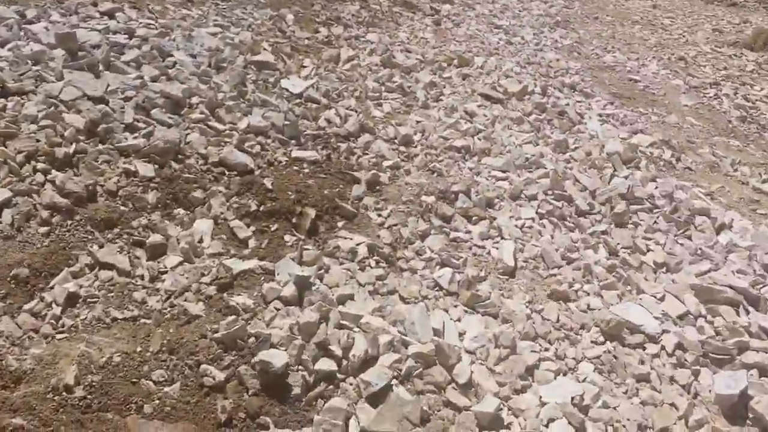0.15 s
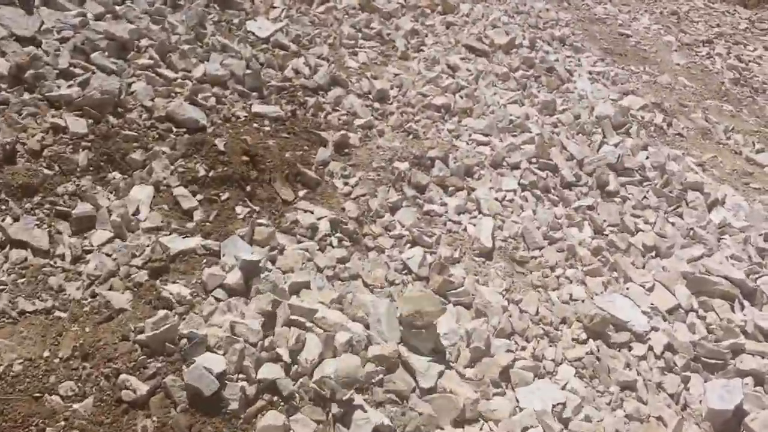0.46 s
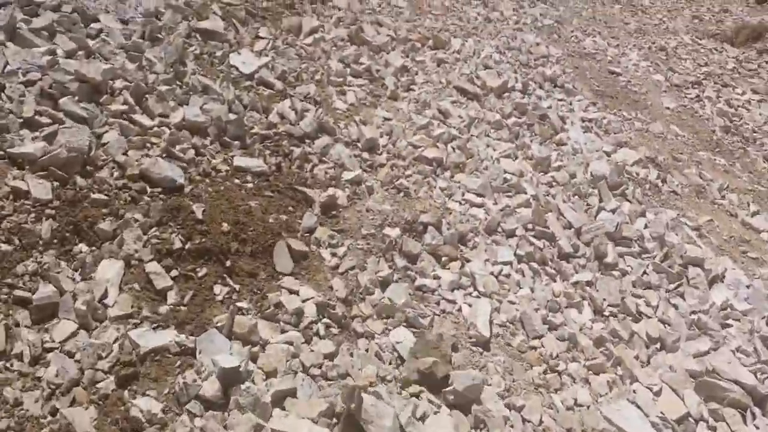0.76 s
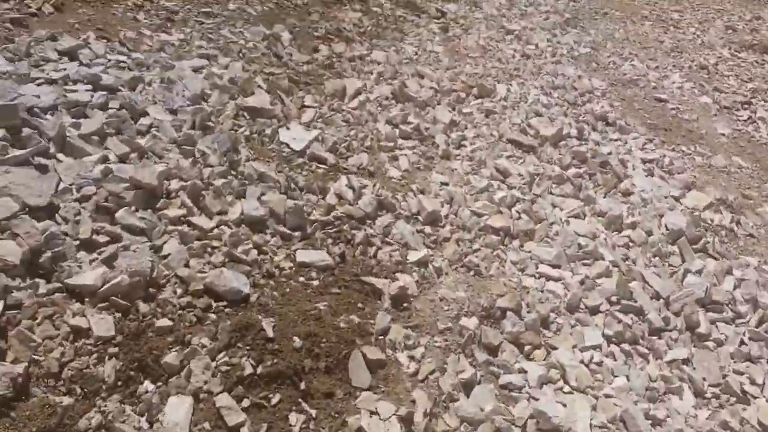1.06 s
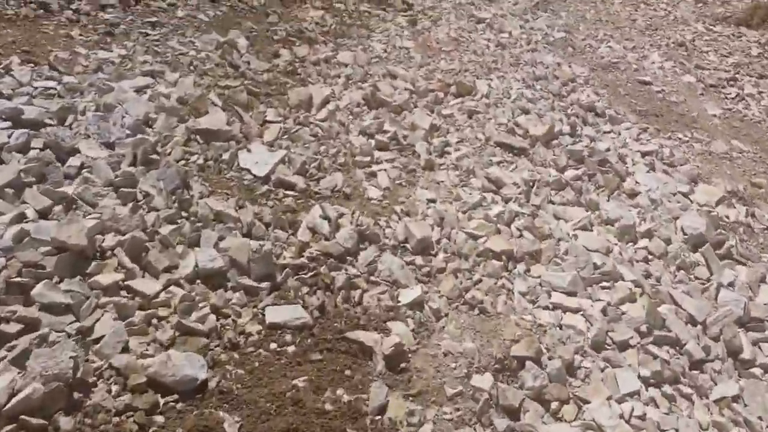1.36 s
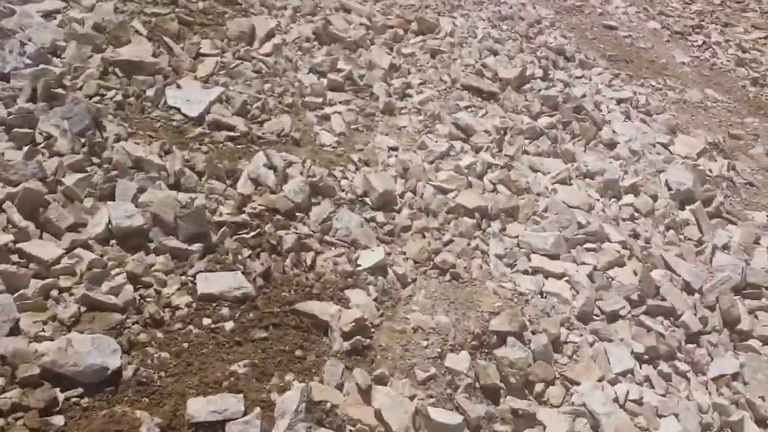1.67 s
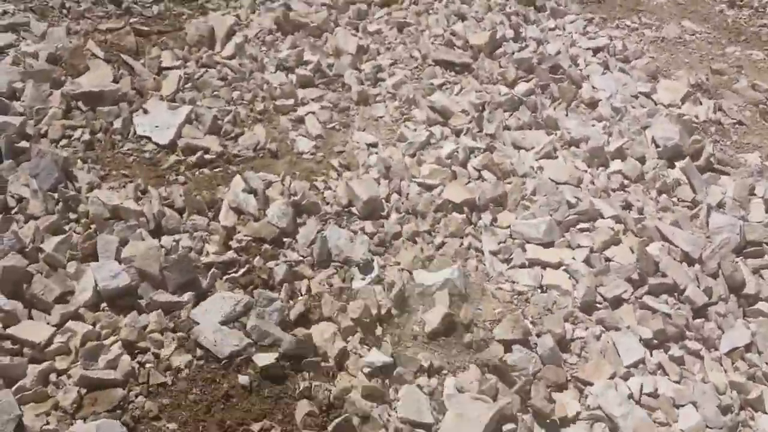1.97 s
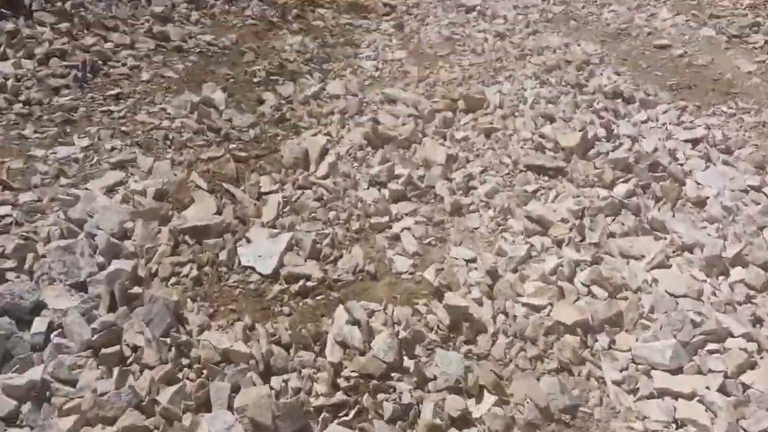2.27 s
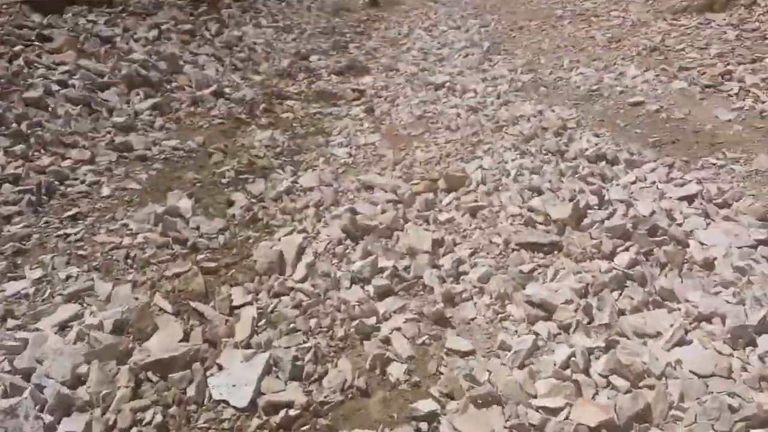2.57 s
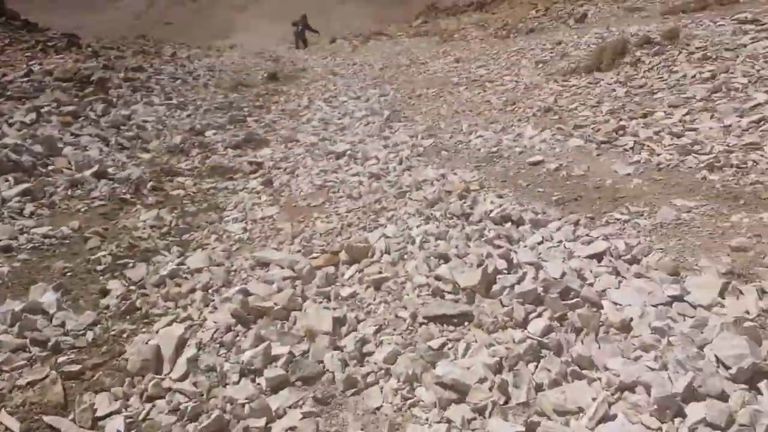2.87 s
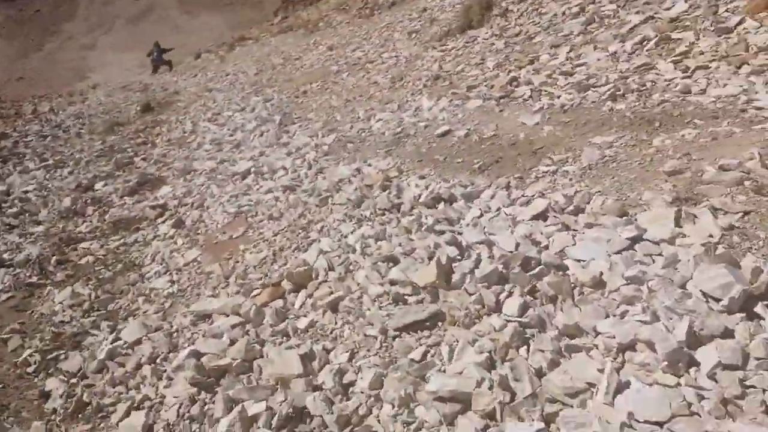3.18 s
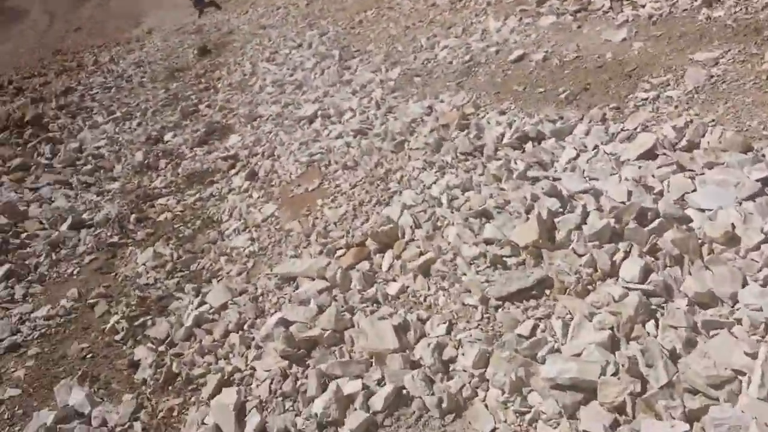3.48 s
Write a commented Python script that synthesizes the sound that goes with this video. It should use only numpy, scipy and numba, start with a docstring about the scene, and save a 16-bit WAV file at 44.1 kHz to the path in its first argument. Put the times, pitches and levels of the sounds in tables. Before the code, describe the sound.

Loose scree slides and clatters close to a hand-held camera, dry and bright outdoors. Gravel rattles with hard stone clacks from the start, thinning after 0.5 seconds. Wind thuds on the left, roughest near 1.3. A crunching boot shove and dense slide burst out at 1.4-1.8, easing into scattered clacks by 2.3. Crunches return at 2.4-3.0, a brief gust at 3.3, and stones surge again at the end.

```python
"""Boots on a scree slope

Boots slide down steep loose rock, heard close by from a hand-held camera with two microphone ports.
Low crunches and sandy hiss are dense random contacts; running grit and chips are crackle and tiny rings.
Single stones clack, ring briefly and knock, each with one rebound. Wind buffets mostly the left port,
whose colour is hollow and resonant; a limiter softens the loudest moments."""
import sys
import numpy as np
from scipy import signal
from scipy.fft import rfft, irfft
from scipy.io import wavfile
from scipy.ndimage import uniform_filter1d, minimum_filter1d
from numba import njit

SR = 44100
rng = np.random.default_rng(int(sys.argv[2]) if len(sys.argv) > 2 else 0)


def log_audio(samples):
    """Write samples as a 16-bit WAV file to the path given in sys.argv[1]."""
    # one column per channel
    frames = np.atleast_2d(samples).T
    # limit to full scale, then quantise
    limited = np.clip(frames, -1, 1)
    pcm = np.round(limited * 32767).astype(np.int16)
    wavfile.write(sys.argv[1], SR, pcm)


N = 159642

# weight of the boots shoving the scree, before each layer's own offset: time_s, level_db
BOOT_SHOVE = [(0, -40.5), (.17, -43), (.25, -46.5), (.315, -35), (.39, -46), (.6, -55.5), (.95, -52.5),
              (1.3, -45), (1.38, -35.5), (1.49, -34.5), (1.55, -28.5), (1.66, -37), (1.75, -48.5),
              (1.95, -57.5), (2.39, -51), (2.425, -35.5), (2.52, -39), (2.58, -38), (2.72, -35.5),
              (2.85, -33), (2.89, -39), (3.02, -40), (3.25, -51), (3.45, -46.5), (3.53, -35.5), (3.62, -40)]
# how much scree is running, before each layer's own offset: time_s, level_db
SCREE_FLOW = [(0, -28), (.13, -27.5), (.16, -31), (.19, -27), (.35, -29), (.48, -28.5), (.6, -34.5),
              (.8, -34), (.95, -38), (1.12, -36), (1.21, -38), (1.325, -38), (1.385, -23.5), (1.46, -21.5),
              (1.58, -23.5), (1.78, -24.5), (2.02, -27.5), (2.2, -31), (2.3, -31), (2.45, -32),
              (2.49, -36.5), (2.56, -36), (2.61, -29), (2.8, -29), (2.93, -32), (3.02, -29), (3.15, -32),
              (3.44, -31.5), (3.53, -28.5), (3.62, -24)]
# modes of a struck slab: ratio to its pitch, level_db
SLAB_MODES = [(0.581, -5.5), (0.798, -6.5), (1, 0.5), (1.311, -7.5), (1.74, -9)]


def undb(db):
    """Decibels to gain."""
    return 10 ** (np.asarray(db) / 20)


def unit(x):
    """Scale to rms 1."""
    return x / np.sqrt(np.mean(x ** 2))


def curve(rows):
    """Join (time_s, value) rows by straight lines."""
    times, values = np.array(rows).T
    return np.interp(np.arange(N) / SR, times, values)


def walk(rate_hz):
    """Smooth random drift of rms 1, heading for a new value at the given rate."""
    step = max(int(SR / rate_hz), 1)
    stairs = np.repeat(rng.standard_normal(N // step + 1), step)
    return unit(uniform_filter1d(stairs, step)[:N])


def colour(x, points, size=262144):
    """Causal, minimum-phase filter through (freq_hz, level_db) points."""
    hz, db = np.array(points).T
    freqs = np.maximum(np.arange(size // 2 + 1) * SR / size, 1)
    level_db = np.interp(np.log(freqs), np.log(hz), db)
    # folding the cepstrum onto positive time makes the filter causal
    cepstrum = irfft(np.log(undb(level_db)))
    cepstrum[1:size // 2] *= 2
    cepstrum[size // 2 + 1:] = 0
    response = np.exp(rfft(cepstrum))
    return irfft(rfft(x, size) * response)[..., :N]


@njit
def rings(start_s, hz, t60_s, gain, out_size):
    """Sum of damped sines, one for each struck mode."""
    out = np.zeros(out_size)
    for k in range(len(start_s)):
        first = int(start_s[k] * SR) + 1
        rate = (2j * np.pi * hz[k] - np.log(1000.) / t60_s[k]) / SR
        # start between samples, then turn and shrink by one step per sample
        state = gain[k] * np.exp(rate * (first - start_s[k] * SR))
        step = np.exp(rate)
        for i in range(max(first, 0), min(first + int(t60_s[k] * SR), out_size)):
            out[i] += state.imag
            state *= step
    return out


def contacts(per_s, spread_db, lag_spread_s, size=48000):
    """Random contacts, mostly weak: arrival times and signed strengths at the two ports."""
    port_lag_s, pan_spread_db = .00002, 3
    count = int(per_s * N / SR)
    u = rng.random((size, 2))[:count]
    g = rng.standard_normal((size, 2))[:count]
    signs = (-1) ** np.arange(len(u))
    strength = signs * undb(spread_db * np.minimum(-np.log(u[:, 1]), 4.5))
    sides = np.array([[.5], [-.5]])  # left, right
    times = u[:, 0] * N / SR + sides * (port_lag_s + lag_spread_s * g[:, 0])
    return times, strength * undb(sides * pan_spread_db * g[:, 1])


def clicks(times, gains):
    """One sharp impulse for each contact, at both ports."""
    ports = []
    for t, gain in zip(times, gains):
        places = np.clip(t * SR, 0, N).astype(int)
        ports.append(np.bincount(places, gain, N + 1)[:N])
    return np.array(ports)


def crunch():
    """The packed stones under a boot grind together: dense contacts coloured low."""
    # spectrum of the grinding: freq_hz, level_db
    crunch_spectrum = [(40, -21), (120, -14), (250, -2), (550, 1.5), (850, -0.5), (1400, -6), (2000, -20.5),
                       (3500, -13), (8000, -29)]
    hits = clicks(*contacts(per_s=1800, spread_db=1, lag_spread_s=.00011))
    grains = unit(colour(hits, crunch_spectrum))
    return grains * undb(3.5 + curve(BOOT_SHOVE) + 2 * walk(60))


def sand():
    """Fine sand hisses under a boot while it shoves: very dense contacts coloured high."""
    # spectrum of the hiss: freq_hz, level_db
    sand_spectrum = [(2000, -35), (6000, -12), (9500, -1), (12000, 0), (14500, -3)]
    hits = clicks(*contacts(per_s=9000, spread_db=2.2, lag_spread_s=.0001))
    return unit(colour(hits, sand_spectrum)) * undb(-13 + curve(BOOT_SHOVE))


def grit():
    """Gravel sizes crackle in their own registers; all surge together, and each about as much on its own."""
    # gravel sizes, coarse to fine: centre_hz, contacts_per_s, strength_spread_db, level_db
    gravel_sizes = [(1220, 1300, 2.5, -8), (2470, 1200, 3.6, -4), (4160, 1200, 3, -3),
                    (5700, 1300, 3.5, -1), (7500, 1500, 3.5, -3.5), (11300, 4500, 2.8, -5.5)]
    # share of coarse gravel: time_s, boost_db (in full an octave or more below fine_hz)
    coarse_share = [(0, 5), (.2, 0.5), (1.0, 1), (1.45, 1), (1.9, -2), (2.4, 2), (2.8, -2.5), (3.05, -2),
                    (3.4, -3), (3.55, 2.5)]
    # colour laid over all the grit: freq_hz, level_db
    grit_spectrum = [(100, -34), (400, -16), (800, 1), (1500, -1.5), (3000, -0.5), (5500, 1.5), (8000, 0),
                     (11000, 2), (14500, 0.5)]
    fine_hz = 4850
    width = 0.3  # share of the centre on each side
    mix = 0
    for hz, per_s, spread_db, db in gravel_sizes:
        edges = [hz * (1 - width), hz * (1 + width)]
        band = signal.butter(2, edges, "bandpass", fs=SR, output="sos")
        grains = signal.sosfilt(band, clicks(*contacts(per_s, spread_db, lag_spread_s=.00008)))
        coarse_db = curve(coarse_share) * np.clip(np.log2(fine_hz / hz), 0, 1)
        own_surge_db = 1.54 * walk(50)
        mix = mix + unit(grains) * undb(db + coarse_db + own_surge_db)
    shared_surge_db = 1.43 * walk(90)
    return unit(colour(mix, grit_spectrum)) * undb(-2 + curve(SCREE_FLOW) + shared_surge_db)


def chips(size=8000):
    """Small flakes tumble along; each ticks and rings in slab modes at its own pitch."""
    # colour laid over all the chips: freq_hz, level_db
    chip_spectrum = [(200, -36), (500, 0.5), (900, -0.5), (2000, -1), (5500, -0.5), (9000, -5), (14500, -6)]
    middle_hz, spread_octaves, middle_t60_s = 5200, .55, 0.012
    times, gains = contacts(per_s=800, spread_db=2, lag_spread_s=.00007)
    g = rng.standard_normal((size, 2 + 2 * len(SLAB_MODES)))[:times.shape[1]].T
    pitch = middle_hz * 2 ** (spread_octaves * g[0])
    t60 = middle_t60_s * 2 ** np.clip(g[1], -1, 1)
    mix = 1.25 * clicks(times, gains)
    for k, (ratio, db) in enumerate(SLAB_MODES):
        hz = np.minimum(pitch * ratio, SR * .45)
        ports = []
        for c in (0, 1):
            mode_gain = gains[c] * undb(db) * g[2 + 2 * k + c] / 2
            ports.append(rings(times[c], hz, t60, mode_gain, N))
        mix = mix + np.array(ports)
    return unit(colour(mix, chip_spectrum)) * undb(-5 + curve(SCREE_FLOW))


def clacks(size=2048):
    """Larger stones collide and rebound: a crack, a short ring, a dull knock and a scrape of grit."""
    # collisions, levels before the offsets below:
    # start_s, strength_db, ring_hz, knock_db, ring_t60_s, scrape_db
    collisions = [(0.02, -4, 3230, -8, 0.016, -19), (0.0563, -16.5, 5360, 4, 0.01, -14),
                  (0.067, -12, 7100, 2, 0.011, -16), (0.0952, -13, 5900, -19, 0.011, -14),
                  (0.122, -3, 7400, -14, 0.011, -14), (0.1511, -0.5, 6470, -18, 0.0086, -12),
                  (0.175, -9, 5600, -5.5, 0.011, -14), (0.2466, -10, 4450, -29, 0.011, -14),
                  (0.27, -12.5, 5900, -20, 0.011, -14), (0.3493, -8, 6650, -33, 0.012, -16),
                  (0.481, -11, 5430, -13, 0.0099, -14), (0.5067, -21, 5430, -28, 0.011, -17),
                  (0.6225, -16.5, 5840, -17, 0.011, -14), (0.6644, -13, 5030, -7, 0.011, -11),
                  (0.7162, -14, 5830, -3.5, 0.012, -19), (0.7578, -15, 5630, -32, 0.011, -14),
                  (0.8031, -12, 5640, -30, 0.01, -12), (0.9053, -16, 6100, -29, 0.011, -14),
                  (0.9837, -23, 5860, 0, 0.011, -14), (1.1159, -15.5, 5000, -5, 0.01, -14),
                  (1.1363, -12, 6300, -18, 0.011, -12), (1.2534, -12.5, 6460, -9, 0.0097, -10),
                  (1.287, -14, 6000, -27, 0.011, -10), (1.3374, -14, 4800, -10, 0.011, -12),
                  (1.3693, -11, 5460, -9, 0.01, -16), (1.4697, -5.5, 3960, -26, 0.011, -16),
                  (1.6556, -10.5, 5500, -24, 0.012, -14), (1.7409, -9, 4870, -17, 0.011, -14),
                  (1.7807, -2, 5530, -30, 0.011, -14), (1.8424, -8.5, 6150, -41, 0.011, -14),
                  (1.868, -11, 5700, -29, 0.011, -17), (1.8861, -7, 5270, -29, 0.011, -19),
                  (1.9151, -9.5, 5640, -30, 0.011, -14), (1.9844, -10.5, 5960, -20, 0.01, -16),
                  (2.0594, -7.5, 5260, -26, 0.01, -14), (2.072, -8.5, 5100, -21, 0.012, -14),
                  (2.144, -9, 5320, -28, 0.011, -14), (2.162, -4.5, 5320, -9, 0.01, -14),
                  (2.223, -8.5, 5750, -22, 0.0077, -15), (2.375, -9.5, 6030, -9, 0.011, -16),
                  (2.388, -7, 2500, -25, 0.011, -17), (2.4108, -8, 5700, -25, 0.0094, -16),
                  (2.4626, -8, 5160, -13, 0.01, -18), (2.5985, -14, 5250, -25, 0.011, -14),
                  (2.8793, -9.5, 5800, -31, 0.0099, -10), (2.9283, -13.5, 5550, -22, 0.0095, -13.5),
                  (2.9594, -5, 4960, -11, 0.013, -17), (3.1127, -10, 6000, -31, 0.011, -17),
                  (3.2126, -7.5, 5200, -39, 0.014, -14), (3.231, -11, 5600, -17, 0.011, -17),
                  (3.2588, -6.5, 5230, -29, 0.0076, -14), (3.3086, -15, 8050, -23.5, 0.011, -11),
                  (3.3211, -9.5, 5180, -28, 0.013, -15), (3.3867, -9.5, 5950, -22, 0.009, -15),
                  (3.412, -11, 5600, -28, 0.011, -14), (3.4761, -10, 6000, -10, 0.011, -14),
                  (3.4845, -6.5, 4920, -10, 0.01, -13), (3.5129, -7, 4930, -11, 0.01, -14)]
    # colour laid over all the collisions: freq_hz, level_db
    crack_spectrum = [(200, -20.5), (900, 0), (2500, -1), (6500, 0), (9000, -2.5), (14500, -3.5)]
    clack_db, crack_db, rebound_db = -1.5, -4, -9.5
    delay_s = .0008  # short fixed delay before each collision sounds
    rebound_s = .011  # middle wait for the second touch
    crack_decay_s, scrape_decay_s = 0.00031, 0.0016  # time constants
    knock_offset_db, middle_knock_hz, knock_t60_s = 1.5, 1520, 0.0086
    out = np.zeros((2, N + 2 * size))
    t = np.arange(size) / SR
    ratio, mode_db = np.array(SLAB_MODES).T
    for at, db, pitch, knock_db, t60, scrape_db in collisions:
        # all modes but the pitch itself are detuned at random
        detune = 0.056 * rng.standard_normal(len(ratio)) * (ratio != 1)
        hz = pitch * ratio * (1 + detune)
        knock_hz = middle_knock_hz * np.array([.62, 1, 1.75]) * np.exp(0.21 * rng.standard_normal(3))
        knock = np.sin(2 * np.pi * knock_hz[:, None] * t).mean(0) * undb(-60 * t / knock_t60_s)
        first = max(int((at + delay_s) * SR), 0)
        second = first + int(rebound_s * SR * rng.uniform(.7, 1.3))
        for c in (0, 1):
            cycles = hz[:, None] * t + rng.random((len(hz), 1))
            ring = undb(mode_db) @ np.sin(2 * np.pi * cycles) * undb(-60 * t / t60)
            crack = rng.standard_normal(size) * np.exp(-t / crack_decay_s)
            scrape = rng.standard_normal(size) * np.exp(-t / scrape_decay_s)
            hit = ring / 2 + 2 * undb(crack_db) * crack / np.linalg.norm(crack)
            hit += undb(scrape_db) * scrape + undb(knock_offset_db + knock_db) * knock
            out[c, first:first + size] += undb(clack_db + db) * hit
            out[c, second:second + size] += undb(clack_db + db + rebound_db) * hit
    return colour(out[:, :N], crack_spectrum)


def wind():
    """Eddies hit mostly the left port in uneven thuds, rough in strong gusts; a faint rumble stays on both."""
    # wind on the microphone, before its offset: time_s, level_db
    gusts = [(0, -46), (.15, -53), (.28, -63), (.43, -42), (.56, -55), (.69, -64), (.76, -36.5), (.8, -45),
             (.9, -29), (.98, -36), (1.06, -30), (1.2, -28), (1.3, -21.5), (1.39, -29.5), (1.49, -31.5),
             (1.54, -42), (1.63, -47), (1.66, -25.5), (1.69, -51), (1.77, -40), (1.82, -31), (1.93, -29),
             (2.05, -31), (2.19, -32), (2.26, -49.5), (2.65, -76), (2.98, -56), (3.12, -43), (3.34, -29),
             (3.5, -43), (3.62, -40)]
    # brighter, rough turbulence in the strong gusts, before its offset: time_s, level_db
    turbulence = [(.7, -60), (.88, -42), (.96, -44), (1.03, -35.5), (1.12, -31), (1.2, -28), (1.27, -19),
                  (1.335, -23.5), (1.37, -30), (1.55, -46), (1.66, -45), (1.7, -72), (3.2, -63),
                  (3.33, -47), (3.45, -64)]
    # spectra of the low rumble and the rough buffeting: freq_hz, level_db
    rumble_spectrum = [(15, -25), (45, -9.5), (75, 0.5), (120, 1.5), (180, -2), (240, -11), (330, -30.5),
                       (700, -49), (2000, -77)]
    buffet_spectrum = [(50, -32), (150, -12), (250, 1), (340, -2.5), (480, -12.5), (750, -24.5),
                       (2000, -50)]

    def air(spectrum):
        """Coloured noise, independent at each port."""
        return unit(colour(rng.standard_normal((2, N)), spectrum))

    eddies_per_s = 27 * np.exp(.35 * walk(30))
    turns = np.cumsum(eddies_per_s) / SR
    thuds = unit(undb(5 * np.cos(2 * np.pi * turns) + walk(45)))
    rumble = air(rumble_spectrum) * undb(6.5 + curve(gusts))
    buffet = air(buffet_spectrum) * undb(4 + curve(turbulence))
    port_gain = undb([[0], [-22]])  # left, right
    breeze = air(rumble_spectrum) * undb(-51.5 + 2 * walk(5.64))
    return thuds * (rumble + buffet) * port_gain + breeze


def scene():
    """All the stones pass through the coloured ports; the wind is added on top, uncoloured by them."""
    # colour of each microphone port: freq_hz, level_db
    left_port = [(100, 2), (600, 0.5), (1000, 1), (1550, 9), (1950, 1.5), (2600, 4.5), (3150, 4),
                 (3700, -2), (4500, 6), (5450, 10.5), (6500, 7), (8000, 5.5), (10000, -4), (12000, -1.5),
                 (14500, -8)]
    right_port = [(100, 1), (600, -1.5), (1000, -1.5), (1450, -2), (2100, 1), (3700, 1), (4020, 4),
                  (4300, 0), (5100, 1), (6000, 1), (7900, 5.5), (10000, 4), (14500, -0.5)]
    left, right = crunch() + sand() + grit() + chips() + clacks()
    stones = np.array([colour(left, left_port), colour(right, right_port)])
    return stones + wind()


def record(dry):
    """The camera's limiter ducks both ports briefly around loud peaks, clips what is left and cuts the top."""
    threshold_db, hold_s, ratio, top_hz = -7.5, .008, 2, 14450
    hold = int(hold_s * SR)
    loudness = uniform_filter1d(np.abs(dry).max(0), size=44)  # about 1 ms, louder port
    excess = np.minimum(undb(threshold_db) / np.maximum(loudness, 1e-6), 1)
    wanted = excess ** (1 - 1 / ratio)
    gain = uniform_filter1d(minimum_filter1d(wanted, hold), hold)
    clipped = np.clip(dry * gain, -1, 1)
    lowpass = signal.ellip(8, .2, 70, top_hz, fs=SR, output="sos")
    return signal.sosfilt(lowpass, clipped)


dry = scene()
out = record(dry)
log_audio(out)
```